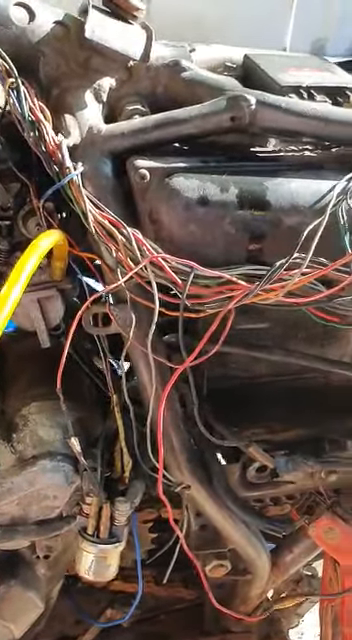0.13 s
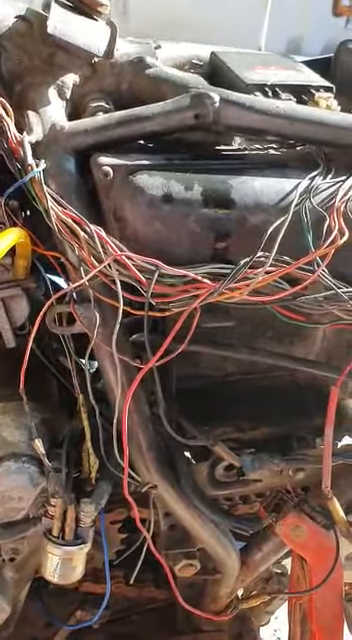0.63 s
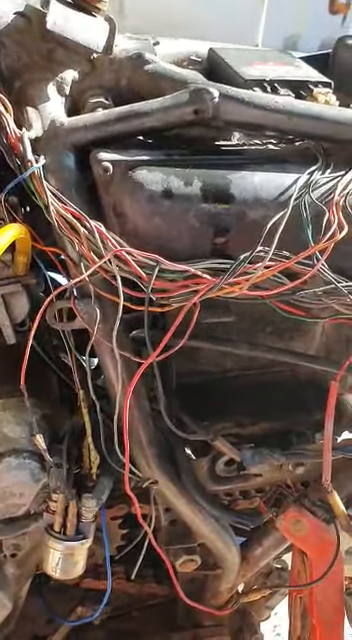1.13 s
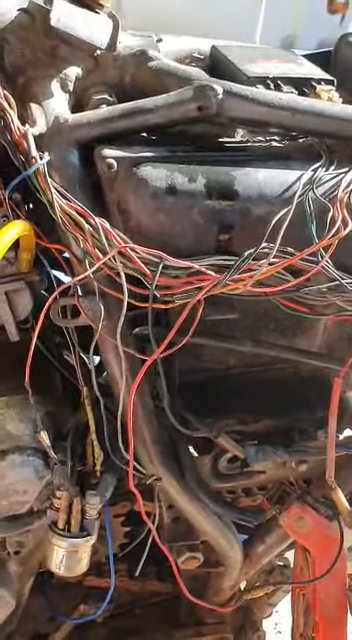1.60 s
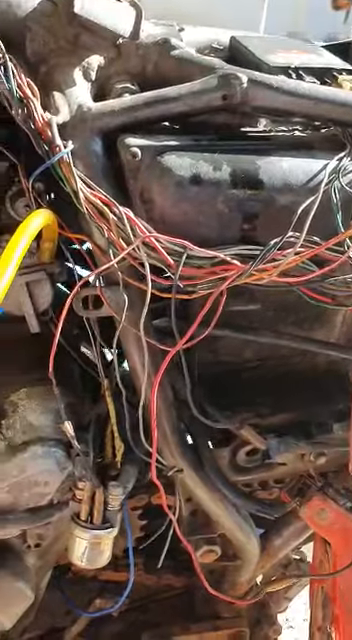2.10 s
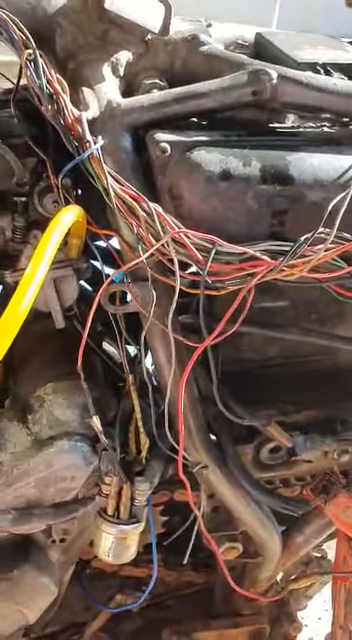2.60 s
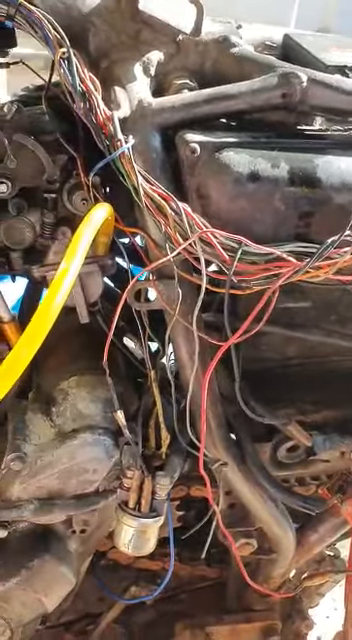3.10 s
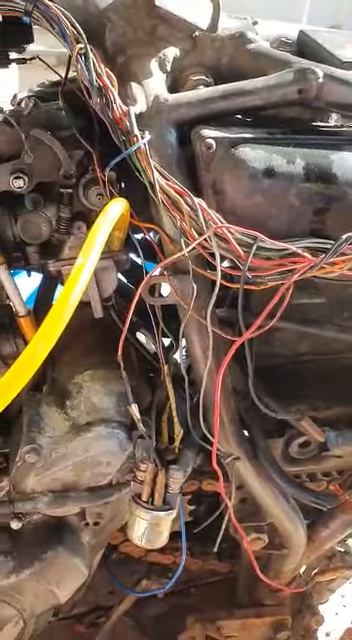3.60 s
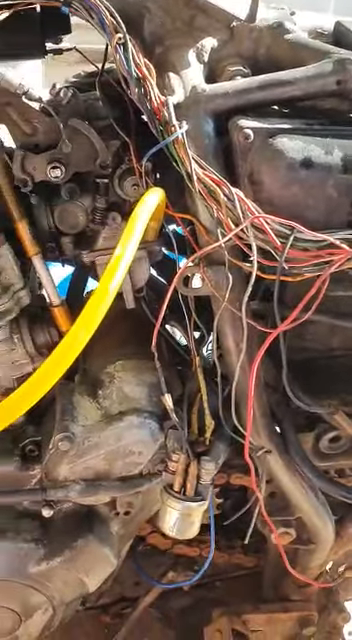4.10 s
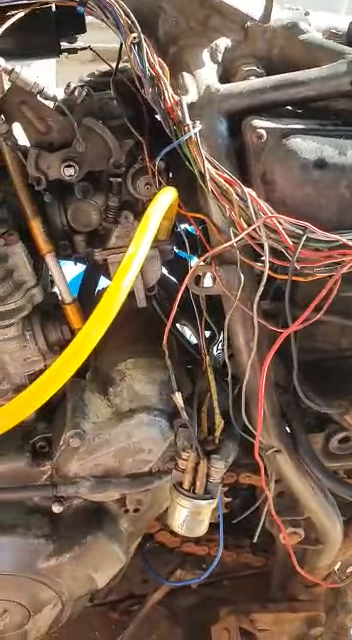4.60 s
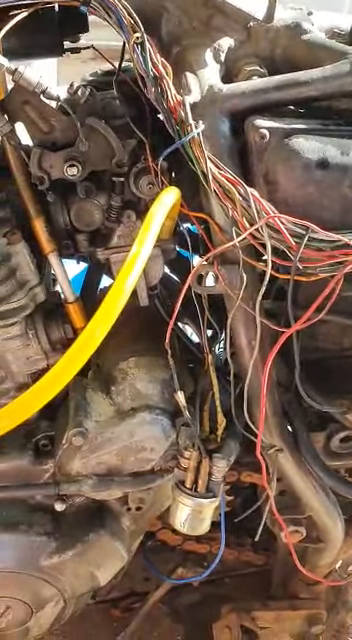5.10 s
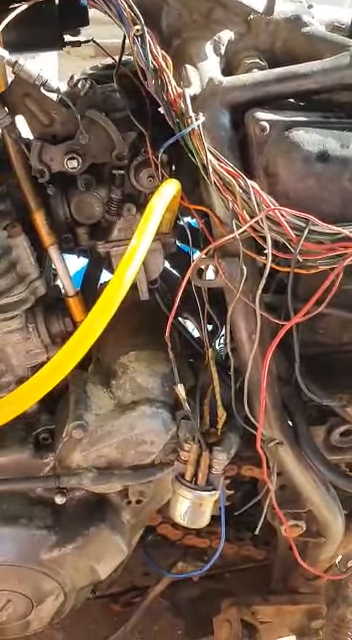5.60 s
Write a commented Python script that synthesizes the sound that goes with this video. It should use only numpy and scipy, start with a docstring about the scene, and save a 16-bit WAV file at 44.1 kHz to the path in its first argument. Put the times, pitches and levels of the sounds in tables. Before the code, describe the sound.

A close stereo microphone hears a bare engine cranked with great effort in the open air. A soft dull rumble comes first, then five rough half-second grinding bursts separated by short pauses, with a false start before the fifth and a weaker sixth cut short. Deep exhaust pulses echo down a pipe, gears bite, metal rings and small parts tick. A distant engine's steady low hum and quiet hiss stay behind, with little echo.

```python
"""A soft outdoor hush and another engine idling a little way off come first, with a dull rumble.
Then a stripped engine is cranked slowly, about one heavy turn a second: filtered noise grinds and hisses,
bites and heaves, and rings the metal. An exhaust valve opens with a thump that echoes down a pipe.
Shudders and short falling whistles mark the compressions, and small metal parts click.
Noise makes the rubbing and the hush; sine waves make the idle and whistles; pulses make the thumps."""
import sys
import numpy as np
from scipy import signal
from scipy.fft import rfft, irfft, next_fast_len
from scipy.io import wavfile
from scipy.ndimage import uniform_filter1d, map_coordinates

SR = 44100
rng = np.random.default_rng(int(sys.argv[2]) if len(sys.argv) > 2 else 0)


def gain_from_db(level_db):
    """Convert decibel levels to linear amplitude factors (20 dB per decade)."""
    decades = np.asarray(level_db, float) / 20
    return 10 ** decades


def wav_out(sig):
    """Save sig, one row per channel (or a flat mono array), as 16-bit PCM at SR to the path in sys.argv[1]."""
    wavfile.write(sys.argv[1], SR, np.round(np.clip(np.atleast_2d(sig).T, -1, 1) * 32767).astype(np.int16))


N = 251811  # length in samples

# Outdoor hush, its tone colour: f/Hz, relative level per Hz/dB
HUSH_COLOUR = [(65, -50), (110, -16.5), (141, -13), (201, -8.5), (293, -14), (400, -15), (2500, -21),
               (2780, -21.5), (16000, -50)]
# Outdoor hush, its loudness: t/s, level/dB
HUSH_LEVEL = [(0, -41.5), (1, -43), (2, -41.5), (2.95, -44), (3.9, -43.5), (5, -44), (5.71, -42.5)]
# How alike the hush is left and right: f/Hz, likeness (1 = the same)
HUSH_LIKENESS = [(60, 0.88), (240, 1), (950, 0.55), (3770, 0.083), (15000, 0.024)]
# Far engine: t/s, base tone f/Hz, relative level/dB, extra level of the higher tones/dB
IDLE = [(0, 46.5, -42.5, 0.5), (1, 47.5, -41.5, -3.5), (2, 47.5, -39, -3), (3, 47.5, -40.5, -1),
        (4, 47.5, -37.5, -4.5), (5, 47.5, -39, -4), (5.4, 48.5, -33.5, -4.5), (5.71, 50, -38.5, -13)]
# Tones of the far engine: multiple of the base tone, relative level/dB
IDLE_TONES = [(1, -0.5), (1.5, -3.5), (2, -4), (2.5, -18.5)]
# Tone colour of the dull rumbles: f/Hz, relative level/dB
RUMBLE_COLOUR = [(120, -5), (200, 8.5), (450, 3.5), (700, -7), (1200, -35)]
# Dull rumbles pass: from t/s, until t/s, level/dB
RUMBLES = [(0.036, 0.143, -39.5), (5.298, 5.596, -43.5)]

# Resonances of the crankcase and covers: f/Hz, width/Hz, relative level/dB
CASE = [(960, 53, -16), (1367, 84, 0.5), (1797, 44, -4.5), (2270, 270, 0), (2842, 130, -2.5),
        (3343, 176, -0.5), (4170, 26, -4.5), (4323, 92, -4), (5320, 400, -5.5), (6420, 470, -2.5),
        (7950, 190, -8), (8650, 210, -4), (9410, 51, -2.5), (9800, 146, -1), (12300, 77, -11)]
# Resonances of the heavy block: f/Hz, width/Hz, relative level/dB
BLOCK = [(259, 21, -1), (409, 53, 5), (584, 50, 5), (749, 120, 6.5)]
# Tone colours of the four layers of a turn: f/Hz, relative level/dB
GRIND_COLOUR = [(700, -13), (1100, -0.5), (1600, 5), (3000, 0), (3800, -7.5), (5000, -27.5)]
GROAN_COLOUR = [(110, -5), (170, -5.5), (400, -1.5), (600, -1.5), (900, -2), (1300, -46)]
RASP_COLOUR = [(3000, -2.5), (3900, 4), (5500, -6.5), (6900, -12), (8000, -67)]
HISS_COLOUR = [(6000, -10), (7300, 1.5), (10000, -1), (13000, 1.5), (15600, -7.5), (16200, -37)]
# Part of the rubbing that reaches left and right alike: f/Hz, share of the power (0-1)
SHARED_RUBBING = [(250, 1), (500, 0.79), (1000, 0.25), (3000, 0.47), (12000, 0)]

# Answer of the frame, ground and walls, time to die by 60 dB: f/Hz, t/s
YARD_DECAY = [(200, 0.2), (1000, 0.07), (4000, 0.092), (12000, 0.032)]
# Answer of the frame, ground and walls, its tone colour: f/Hz, relative level/dB
YARD_COLOUR = [(100, -21), (300, -56), (700, -7.5), (3000, -7), (12000, -5.5)]
# Gear teeth knock the case: t/s, relative level/dB
KNOCKS = [(0.156, -38), (0.231, -33), (1.176, -36), (1.2201, -46), (1.28, -27), (1.341, -23), (2.154, -34),
          (2.1804, -35), (2.2388, -25.5), (2.2642, -22), (2.2904, -24), (3.1243, -42), (3.1625, -31),
          (4.0251, -21), (4.0832, -16), (5.0858, -51), (5.201, -23), (5.464, -18), (5.4914, -19.5)]

# The crank drags round, one row a turn and one for a false start: full from t/s, until t/s,
# relative level/dB, rise/(dB/s), delay of the treble/s, treble over its usual share/dB
DRAGS = [(0.246, 0.734, -26, 218, 0.058, -0.5), (1.282, 1.776, -27.5, 160, 0.078, 1),
         (2.255, 2.77, -24.5, 182, 0.13, 3.5), (3.178, 3.658, -27, 231, 0.058, 2),
         (4.068, 4.092, -24, 292, 0.019, -4.5), (4.175, 4.757, -23.5, 330, 0.079, -1),
         (5.136, 5.5, -30.5, 355, 0.022, -12)]
# The starter heaves against compression: full from t/s, until t/s, relative level/dB,
# rise/(dB/s), drift/(dB/s)
HEAVES = [(0.34, 0.705, -19, 900, 6.5), (2.329, 2.742, -16.5, 300, 3), (4.296, 4.734, -17.5, 702, 7),
          (5.213, 5.436, -21, 250, -58)]
# The gears bite, hold and let go: t/s, length/s, relative level/dB,
# groan and hiss over their usual share/dB
BITES = [(0.488, 0.043, -21, -1.5, -0.5), (0.645, 0.038, -19, 1, 0), (1.449, 0.0085, -24.5, -1, -2.5),
         (1.551, 0.067, -22, -1.5, 1), (1.713, 0.064, -21, -2, 0.5), (2.532, 0.047, -23, -2, 4),
         (2.699, 0.029, -22.5, -2, 0.5), (3.328, 0.0066, -26.5, 1, 4), (3.36, 0.0084, -33.5, -3, 7),
         (3.438, 0.064, -22.5, 0, 3.5), (3.598, 0.056, -20, -2, 0.5), (4.356, 0.074, -24, 1.5, 0),
         (4.53, 0.038, -23.5, 5, 4.5), (4.68, 0.04, -26.5, 3, 3)]
# The next lists hold one value for each layer: grind, groan, rasp, hiss.
# Usual share of each layer: level/dB
DRAG_SHARE = [-1.5, -9.5, -9.5, -12.5]
HEAVE_SHARE = [-1, -18, -8.5, -17]
BITE_SHARE = [-2, -7, -6, -10]
# How fast each layer dies: fall/(dB/s)
DRAG_FALL = [337, 250, 330, 300]
HEAVE_FALL = [400, 300, 380, 297]
BITE_FALL = [274, 258, 300, 238]
# Slow change of each layer while a drag holds: drift/(dB/s)
DRAG_DRIFT = [-6, -12, -5, -2]
# Part of the treble's delay that each layer takes (0-1)
DELAY_PART = [0, .2, .45, 1]
# Part of a drag's extra treble that each layer takes (0-1)
TREBLE_PART = [0, 0.064, 0.39, 1]
# Loose parts rattle on after a turn: level against the drag/dB
RATTLE_SHARE = [-16, -16, -15, -36]

# Ringing parts of a gear, upper then lower: f/Hz, width/Hz
GEAR = [(5148, 42), (3290, 67)]
# Loudest rings of the gear: t/s, relative level/dB
RINGS = [(1.7131, -21), (2.4749, -19), (2.51, -22), (2.6026, -23), (2.6819, -17), (3.4352, -23),
         (3.6033, -22), (4.4963, -21), (4.55, -23), (4.6594, -23)]
# The exhaust valve opens: t/s, relative pulse strength/dB
THUMPS = [(0.343, 40.5), (1.3887, 41.5), (2.361, 41.5), (3.2751, 40), (4.346, 39), (5.241, 40)]
# Resonances of the silencer: f/Hz, width/Hz, relative level/dB
SILENCER = [(62.9, 4.1, -1), (137, 310, -4.5), (90, 5.5, 1.5)]
# The block shudders as the crank comes over compression: t/s, length/s, peak level/dB
SHUDDERS = [(.66, 0.11, -31), (1.72, 0.12, -35), (2.71, 0.11, -33.5), (3.591, 0.099, -30.5),
            (4.062, 0.084, -32), (4.154, 0.15, -35.5), (4.697, .1, -30)]
# Air squeezed through a closing gap whistles: t/s, relative level/dB
SQUEALS = [(0.681, -19), (1.742, -17.5), (2.726, -15), (3.634, -16), (4.717, -12)]
# Small metal clicks: t/s, relative level/dB, time for the ring to die by 60 dB/s,
# share of the highest ring (0-1)
CLICKS = [(0.7676, -17.5, 0.24, 0.1), (1.955, -21, 0.28, 0), (3.716, -24, 0.064, 0.1),
          (4.025, -12, 0.062, 0.99), (4.084, -18.5, 0.068, 0.3), (5.2, -15, 0.088, 0.97),
          (5.2084, -32, 0.12, 0.7), (5.462, -29, 0.076, 0), (5.4915, -34, 0.086, 0)]
# Tone colours of a click, the usual one and the highest ring: f/Hz, relative level/dB
TICK_COLOUR = [(5000, -17), (7500, -4), (9000, 5), (11000, -4), (16000, -19)]
TINK_COLOUR = [(9000, -28), (11500, 1), (13500, 8), (16000, -6)]

# The listener steps aside: t/s, lead of the left channel/s
LEFT_LEAD = [(0, .00005), (3.7, .00005), (4, .00036), (5.71, .00036)]
# Balance of the engine: f/Hz, left minus right level/dB
BALANCE = [(300, -1.5), (700, 4), (2400, -5), (5000, 7), (12000, 3.5)]


def unit(x):
    """Scales a sound to an average (rms) size of 1."""
    return x / np.sqrt(np.mean(x ** 2) + 1e-20)


def along(points, hz):
    """Reads a (frequency, value) table between its points, on a log frequency axis."""
    f, value = np.transpose(points)
    return np.interp(np.log(hz + 1), np.log(f + 1), value)


def curves(rows):
    """Turns each column after the time into one value per sample."""
    s, *columns = np.transpose(rows)
    return [np.interp(np.arange(N) / SR, s, column) for column in columns]


def wobble(rate):
    """Draws a smooth random curve with `rate` random points a second."""
    points = rng.standard_normal(int(N * rate / SR) + 4)
    return map_coordinates(points, [np.arange(N) * rate / SR])


def filtered(x, response):
    """Filters a sound: each frequency is multiplied by response(frequency)."""
    m = next_fast_len(N + SR // 2)
    return irfft(rfft(x, m) * response(np.fft.rfftfreq(m, 1 / SR)), m)[..., :N]


def modes(table, f):
    """Adds up resonances, each ringing after it is struck; their signs alternate."""
    total = 0
    for k, (centre, width, db) in enumerate(table):
        damping = 1j * f * width
        total = total + (-1) ** k * gain_from_db(db) * damping / (centre * centre - f * f + damping)
    return total


def patchy(x):
    """Makes noise favour now one pitch range, now another, in short random patches."""
    z = signal.stft(x, nperseg=256)[2]
    field = rng.standard_normal(z.shape[1:])
    field = uniform_filter1d(field, size=3, axis=0)  # a few hundred Hz wide
    field = uniform_filter1d(field, size=7, axis=1)  # a few hundredths of a second long
    return unit(signal.istft(z * gain_from_db(1.2 * unit(field)), nperseg=256)[1][:, :N])


def scrape(colour, body, between_db, grit_db, load=1):
    """Gritty rubbing at many points, partly different left and right; under load it rings the body."""
    rub = patchy(rng.standard_normal((3, N))) * gain_from_db(grit_db * wobble(900))
    share = lambda f: np.clip(along(SHARED_RUBBING, f), 0, 1)
    common = filtered(rub[0], lambda f: np.sqrt(share(f)))
    pair = common + filtered(rub[1:], lambda f: np.sqrt(1 - share(f)))
    # between_db lets some noise through between the resonances
    rung = lambda f: gain_from_db(along(colour, f)) * (modes(body, f) + gain_from_db(between_db))
    ringing = unit(filtered(pair, rung))
    outline = [(centre, db) for centre, width, db in body]
    broad = lambda f: gain_from_db(along(colour, f)) * gain_from_db(along(outline, f))
    smooth = unit(filtered(pair[:, ::-1], broad))
    return (np.sqrt(load) * ringing + np.sqrt(1 - load) * smooth) * gain_from_db(0.6 * wobble(45))


def held(start, end, db, rise, fall, drift=0):
    """Power of a gesture: a straight rise in dB, a drifting hold, a straight fall."""
    t = np.arange(N) / SR
    start, db, fall, drift = (np.reshape(v, (-1, 1)) for v in (start, db, fall, drift))
    level = db + drift * (np.clip(t, start, end) - start)
    level = level - rise * np.clip(start - t, 0, 1) - fall * np.clip(t - end, 0, 1)
    return gain_from_db(2 * level)


def hush():
    """Far hiss and rumble made of noise, more alike left and right in the bass."""
    angle = lambda f: np.arccos(np.clip(along(HUSH_LIKENESS, f), -1, 1)) / 2
    colour = lambda f: gain_from_db(along(HUSH_COLOUR, f)) * [np.cos(angle(f)), np.sin(angle(f))]
    mid, side = filtered(rng.standard_normal((2, N)), colour)
    return gain_from_db(curves(HUSH_LEVEL)[0] + 0.8 * wobble(4)) * unit(np.array([mid + side, mid - side]))


def idling():
    """Low tones tied to the turning of the far engine, each a little unsteady."""
    hz, db, higher_db = curves(IDLE)
    turn = 2 * np.pi * np.cumsum(hz) / SR
    tones = []
    for multiple, level in IDLE_TONES:
        strength = gain_from_db(level + 1.9 * wobble(6.5))
        phase = multiple * turn + 0.14 * wobble(7.5) + 6 * rng.random()
        tones.append(strength * np.sin(phase))
    return np.sqrt(2) * gain_from_db(db) * (tones[0] + gain_from_db(higher_db) * sum(tones[1:]))


def rumble():
    """Short dull rolls of noise that swell and fade by 100 dB/s."""
    power = sum(held(s, end, db, 100, 100) for s, end, db in RUMBLES)
    return np.sqrt(power) * scrape(RUMBLE_COLOUR, BLOCK, between_db=-3, grit_db=3.0, load=0.27)


def yard(x):
    """Frame, ground and walls send back dying noise, different left and right and new each 1/8 s."""
    wet, step = np.zeros((2, N + SR)), SR // 8
    for start in range(0, N, step):
        hz, t, z = signal.stft(rng.standard_normal((2, SR // 8)), SR, nperseg=256)
        dying = gain_from_db(-60 * t / along(YARD_DECAY, hz)[:, None])
        tail = signal.istft(z * dying, SR, nperseg=256)[1]
        tail = tail / np.linalg.norm(tail[0])
        answer = signal.fftconvolve(x[None, start:start + step], tail, axes=1)
        wet[:, start:start + answer.shape[1]] += answer
    return filtered(wet[:, :N], lambda f: gain_from_db(along(YARD_COLOUR, f)))


def knocks():
    """Each gear tooth gives the case a burst that dies in a few hundredths of a second."""
    fall, t = np.zeros(N + SR), np.arange(SR // 8) / SR
    for s, db in KNOCKS:
        fall[round(s * SR):][:len(t)] += gain_from_db(db - 60 * t / 0.047)
    low = scrape(GRIND_COLOUR, CASE, between_db=-6.5, grit_db=1.5, load=1.0)
    high = scrape(RASP_COLOUR, CASE, between_db=0, grit_db=-3.5, load=0.59)
    return fall[:N] * (low + gain_from_db(-8) * high)


def effort():
    """Power of the four rubbing layers as the crank drags, heaves and bites."""
    drag, heave, bite = 0, 0, 0
    for s, end, db, rise, late, treble_db in DRAGS:
        start = np.minimum(s + late * np.array(DELAY_PART), end)
        share = DRAG_SHARE + treble_db * np.array(TREBLE_PART)
        turning = held(start, end, share, rise, DRAG_FALL, DRAG_DRIFT)
        rattle = held(end, end, RATTLE_SHARE, rise, 125)  # falls by 125 dB/s
        drag = drag + gain_from_db(2 * db) * (turning + rattle)
    for s, end, db, rise, drift in HEAVES:
        heave = heave + gain_from_db(2 * db) * held(s, end, HEAVE_SHARE, rise, HEAVE_FALL, drift)
    for s, length, db, groan_db, hiss_db in BITES:
        share = np.add(BITE_SHARE, [0, groan_db, hiss_db / 2, hiss_db])
        bite = bite + gain_from_db(2 * db) * held(s, s + length, share, 2800, BITE_FALL)  # rises by 2800 dB/s
    return drag, heave, bite


def cranking(power):
    """Grind, groan, rasp and hiss of a turn; the harder the grind, the more the metal rings."""
    load = np.clip((10 * np.log10(power[0] + 1e-20) + 39.5) / 12, 0, .9)
    # as the whistling gap closes, the hiss fades by 160 dB/s, from 5 ms after the whistle starts
    since = np.arange(N) / SR - np.array(SQUEALS)[:, :1] - 0.005
    shut = gain_from_db(-160 * np.sum(since * (since > 0) * (since < .25), axis=0))
    layers = [scrape(GRIND_COLOUR, CASE, between_db=-9.5, grit_db=1.5, load=load),
              scrape(GROAN_COLOUR, BLOCK, between_db=-7.5, grit_db=2.5, load=load),
              scrape(RASP_COLOUR, CASE, between_db=-14.0, grit_db=3.0, load=load),
              scrape(HISS_COLOUR, CASE, between_db=-18.5, grit_db=3.5, load=load) * shut]
    return sum(np.sqrt(p) * layer for p, layer in zip(power, layers))


def gear(heave, bite):
    """Two narrow resonances: heaves ring the upper, bites the lower, and short shakes add to the upper."""
    shake, u = np.zeros(N + SR), np.linspace(0, 1, 2200)  # a shake lasts 2200 samples
    for s, db in RINGS:
        shake[round(s * SR):][:len(u)] += gain_from_db(db - 6) * np.minimum(12 * u, 1) * (1 - u)
    # both flicker at random
    upper = shake[:N] + np.sqrt(heave) * gain_from_db(-22.5 + 3 * wobble(25))
    lower = np.sqrt(bite) * gain_from_db(-5.5 + 3 * wobble(25.2))
    rings = []
    for hz, width in GEAR:
        ring = filtered(rng.standard_normal(N), lambda f: modes([(hz, width, 0)], f))
        rings.append(unit(ring))
    return upper * rings[0] + lower * rings[1]


def exhaust():
    """A suction pulse runs up and down the open pipe, turned over and dulled at every return."""
    blows = np.zeros(N)
    for s, db in THUMPS:
        blows[round(s * SR)] = -gain_from_db(db)
        blows[round((s - .006) * SR):][:260] += gain_from_db(db - 54)  # the valve first leaks a little pressure
    pulse = lambda f: 1 / (1 + 1j * f / 150) ** 2 / (1 + 1j * f / 600) ** 2
    # one round trip takes 8.3 ms
    trip = lambda f: .72 * np.exp(-2j * np.pi * f * .0083) / (1 + 1j * f / 480)
    mouth = lambda f: (1j * f / 15) / (1 + 1j * f / 15)  # the open end radiates no steady flow
    silencer = lambda f: 1 + modes(SILENCER, f)
    return filtered(blows, lambda f: pulse(f) * mouth(f) * silencer(f) / (1 + trip(f)))


def shudder():
    """The block's low resonance at 287 Hz, shaken for a moment."""
    t = np.arange(N) / SR
    swell = 0
    for s, length, db in SHUDDERS:
        swell = swell + gain_from_db(db) * np.sin(np.pi * np.clip((t - s) / length, 0, 1))
    return swell * unit(filtered(rng.standard_normal(N), lambda f: modes([(287, 90, 0)], f) ** 2))


def squeals():
    """Air in a closing gap: a breathy whistle falling from 4560 to 3710 Hz, with a lower companion."""
    out, u = np.zeros(N), np.linspace(0, 1, 820)  # a whistle lasts 820 samples
    turn = 2 * np.pi * np.cumsum(4560 + (3710 - 4560) * u) / SR
    whistle = np.sin(np.pi * u) ** .5 * (np.sin(turn) + .45 * np.sin(.72 * turn))
    for s, db in SQUEALS:
        out[round(s * SR):][:len(u)] += gain_from_db(db) * whistle
    return unit(1 + 0.6 * wobble(500)) * out


def clicks():
    """Small parts tick: noise with a sharp edge and a short, bright, hissing ring."""
    fall, t = np.zeros((2, N + SR)), np.arange(SR // 4) / SR
    for s, db, t60, share in CLICKS:
        ring = gain_from_db(db - 9.5 - 60 * t / t60)
        edge = gain_from_db(db + 2.0 - 60 * t / 0.015)
        shape = (ring + edge) * np.minimum(t / 0.0013, 1)
        share = np.clip(share, 0, 1)
        fall[:, round(s * SR):][:, :len(t)] += np.sqrt([[1 - share], [share]]) * shape
    colours = lambda f: gain_from_db([along(TICK_COLOUR, f), along(TINK_COLOUR, f)])
    noises = filtered(rng.standard_normal((2, N)), colours)
    return gain_from_db(-7) * sum(level[:N] * unit(noise) for level, noise in zip(fall, noises))


def scene():
    """The engine stands to one side and reaches the left early; thumps and idle reach both sides alike."""
    drag, heave, bite = effort()
    engine = cranking(drag + heave + bite) + clicks() + knocks() + squeals()
    engine = engine + gear(heave[0], bite[0]) + shudder() + rumble()
    side = np.array([[.5], [-.5]])  # left, right
    when = np.arange(N) + side * SR * curves(LEFT_LEAD)[0]
    shifted = [map_coordinates(channel, [at], order=5) for channel, at in zip(engine, when)]
    near = filtered(np.array(shifted), lambda f: gain_from_db(side * along(BALANCE, f)))
    return near + yard(engine[0]) + exhaust() + idling() + hush()


def roll_off(x):
    """The treble ends steeply here."""
    return signal.sosfilt(signal.butter(12, 16850, fs=SR, output="sos"), x)


def record(dry):
    """The microphone drops the deepest bass, around 37 Hz and below, and the treble from 16250 Hz up."""
    bass_cut = lambda f: (-f * f / (37 ** 2 - f * f + 1j * f * 40)) ** 2
    thin = filtered(dry, lambda f: bass_cut(f) * (f < 16250))
    return roll_off(thin)


dry = scene()
out = record(dry)
wav_out(out)
```